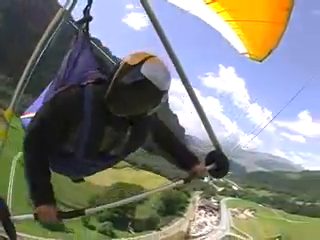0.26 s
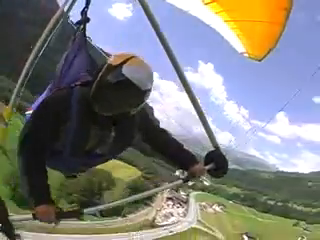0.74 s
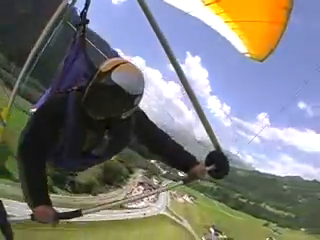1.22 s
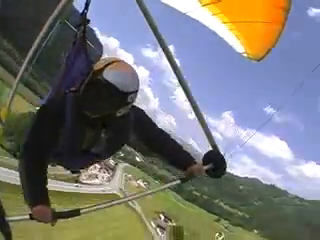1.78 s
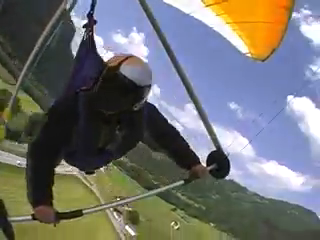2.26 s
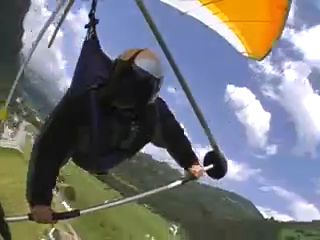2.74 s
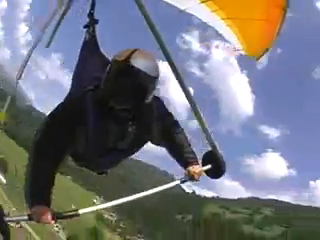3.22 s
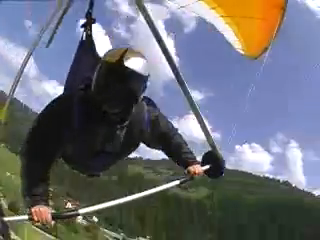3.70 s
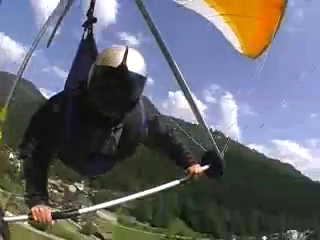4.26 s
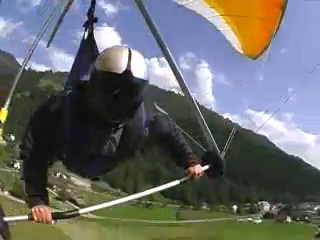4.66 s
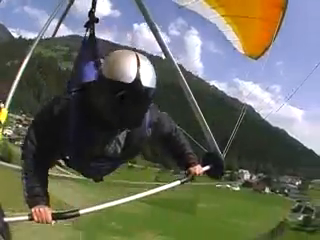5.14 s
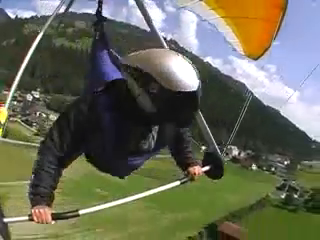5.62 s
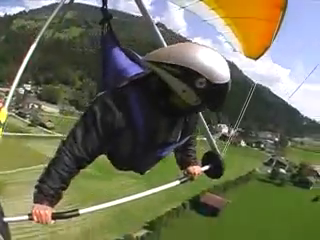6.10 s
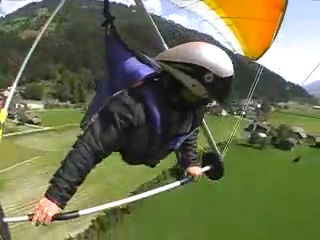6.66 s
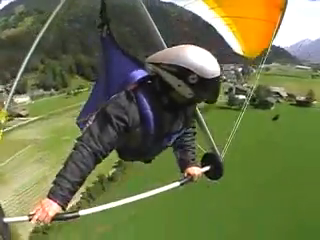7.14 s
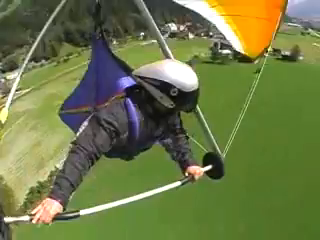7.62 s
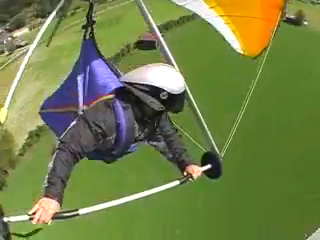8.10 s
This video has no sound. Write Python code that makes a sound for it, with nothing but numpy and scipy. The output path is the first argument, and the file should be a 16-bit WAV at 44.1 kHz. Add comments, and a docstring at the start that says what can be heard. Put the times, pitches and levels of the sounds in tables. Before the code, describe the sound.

Continuous airflow rushes over a microphone in flight, with low thumping gusts building, easing into rough fluttering snaps, and rising at the end.

```python
"""Air streams past the microphone of a camera fixed to a hang glider, swelling in the turn and easing after it.
Large eddies heave, buffet and roar on the port as slow pressure fluctuations, the strongest gusts as single
low thumps. Small eddies flutter and snap at its edge, and the stream rushes and hisses over the frame and the
sail. Each size of eddy is noise filtered to its own band; the small ones ride on the large. One faint treble
tick is a decaying noise burst."""
import sys
import numpy as np
from scipy import signal
from scipy.fft import rfft, irfft, next_fast_len
from scipy.io import wavfile
from scipy.ndimage import uniform_filter1d, map_coordinates

SR = 44100
rng = np.random.default_rng(int(sys.argv[2]) if len(sys.argv) > 2 else 0)


def generate_wav(sig):
    """Save sig (samples, or channels by samples) to the path in sys.argv[1] as 16-bit PCM at SR."""
    pcm = np.round(np.clip(np.atleast_2d(sig).T, -1, 1) * 32767).astype(np.int16)
    wavfile.write(sys.argv[1], SR, pcm)


N = 369116  # samples


def amp(db):
    """Decibel law: the amplitude ratio of a level in dB."""
    return 10 ** (np.asarray(db) / 20)


def unit(x):
    """Normalization by mean square: x brought to rms 1."""
    return x / np.sqrt(np.mean(x ** 2) + 1e-20)


def curves(rows):
    """Linear interpolation: one value per sample for each column after the time."""
    start_s, *columns = np.transpose(rows)
    t = np.arange(N) / SR
    return [np.interp(t, start_s, column) for column in columns]


def wobble(rate_hz):
    """Band-limited chance: a smooth curve through random knots, rate_hz knots a second."""
    knots = rng.standard_normal(int(N * rate_hz / SR) + 4)
    return map_coordinates(knots, [np.arange(N) * rate_hz / SR])


def colour(x, spectrum):
    """Minimum-phase filtering: the folded cepstrum makes the (pitch_hz, level_db) response causal."""
    m = 2 * next_fast_len(N // 2 + 8192)  # even, with room for the filter to ring out
    pitch_hz, level_db = np.transpose(spectrum)
    hz = np.fft.rfftfreq(m, 1 / SR)
    gain_db = np.interp(np.log(hz + 1), np.log(pitch_hz + 1), level_db)
    cepstrum = irfft(np.log(amp(gain_db)), m)
    cepstrum[1:m // 2] *= 2
    cepstrum[m // 2 + 1:] = 0
    response = np.exp(rfft(cepstrum))
    return irfft(rfft(x, m) * response, m)[:N]


def stream(spectrum, lumps_db, patchy_db):
    """Intermittency of turbulence: rms-1 noise, lumpy in time, with random gain patches in time and pitch."""
    cells = signal.stft(rng.standard_normal(N), nperseg=512)[2]
    field = rng.standard_normal(cells.shape)
    field = uniform_filter1d(field, size=6, axis=0)  # across pitch
    field = uniform_filter1d(field, size=8, axis=1)  # along time
    patchy_cells = cells * amp(patchy_db * unit(field))
    noise = signal.istft(patchy_cells, nperseg=512)[1][:N]
    return unit(colour(noise * amp(lumps_db), spectrum))


# spectrum of the treble tick: pitch_hz [Hz], level_db [relative dB per Hz]
TICK_SPECTRUM = [(5000, -40), (6500, -5), (7700, -8), (9500, 1), (10300, 2), (10600, -20.5)]
TICK_START_S, TICK_LEVEL_DB, TICK_T60_S = 0.2575, -47.5, .025  # rms level at the onset


def tick():
    """Exponential decay: one short, thin noise burst in the treble, falling 60 dB in its T60."""
    age_s = np.arange(N) / SR - TICK_START_S
    noise = unit(colour(rng.standard_normal(N), TICK_SPECTRUM))
    decay = (age_s > 0) * amp(TICK_LEVEL_DB - 60 * np.abs(age_s) / TICK_T60_S)
    return noise * decay


# spectrum of the hiss: pitch_hz [Hz], level_db [relative dB per Hz]
HISS_SPECTRUM = [(2500, -45.5), (4000, 3.5), (5500, 2), (7000, 1.5), (9000, -2.5), (10000, -9),
                 (10600, -41.5)]


def hiss(puffs, shreds):
    """Fine-scale turbulence: the smallest eddies give the highest noise band."""
    return stream(HISS_SPECTRUM, 0.5 * puffs + 0.2 * shreds, patchy_db=1.5)


# spectra of the rush in open stream and behind the frame: pitch_hz [Hz], level_db [relative dB per Hz]
OPEN_RUSH_SPECTRUM = [(500, -30), (900, 1.5), (1300, -1), (2000, -4), (3000, -6), (3700, -9.5),
                      (4100, -14.5), (4800, -15.5), (6000, -22.5), (8000, -48.5)]
WAKE_RUSH_SPECTRUM = [(500, -40), (900, 4), (1300, -3), (2000, -8), (3000, -14.5), (4300, -19), (6000, -24),
                      (8000, -48)]


def rush(wake, puffs, shreds):
    """Wake turbulence: the frame breaks the flow into a duller but rougher rush, mixed by power."""
    open_rush = stream(OPEN_RUSH_SPECTRUM, 0.61 * puffs + 0.27 * shreds, patchy_db=0.6)
    wake_rush = stream(WAKE_RUSH_SPECTRUM, 0.69 * puffs + 1.0 * shreds, patchy_db=1.3)
    return np.sqrt(1 - wake) * open_rush + np.sqrt(wake) * wake_rush


# spectrum of the flutter: pitch_hz [Hz], level_db [relative dB per Hz]
FLUTTER_SPECTRUM = [(200, -42), (300, -6), (420, 1), (600, -3), (800, -8), (1100, -25.5), (1600, -33.5),
                    (2500, -63)]


def flutter(wake, puffs, shreds):
    """Edge turbulence: small eddies flutter at the port, less steadily in the wake."""
    lumps_db = 0.3 * puffs + wake * (0.45 * puffs + 0.79 * shreds)
    return stream(FLUTTER_SPECTRUM, lumps_db, patchy_db=0.18)


# spectrum of a bright snap: pitch_hz [Hz], level_db [relative dB per Hz]
SNAP_SPECTRUM = [(300, -25), (700, 3.5), (1200, 1), (2200, -9), (3500, -12), (6000, -23.5), (10000, -59)]


def snap_swarm(level_db):
    """Shot noise: small eddies tear off the port's edge at random, most weakly, a few strongly."""
    place, size, sign = rng.random((3, 3000))
    steps = amp(-4 * np.log(size + 0.03)) * np.sign(sign - .5)
    swarm = np.bincount((place * N).astype(int), steps, N)
    return unit(colour(swarm, SNAP_SPECTRUM)) * amp(level_db)


# the clearest single snaps: start_s [s], level_db [dB, nominal peak], brightness [0 dull - 1 bright]
SINGLE_SNAPS = [(0.208, -23.5, 0.3), (0.3665, -25, 0.3), (1.0321, -24, 0.4), (1.7776, -21, 0.8),
                (2.177, -28, 0.4), (2.9702, -33, 0.5), (3.5635, -25.5, 0.3), (3.7189, -23, 0.5),
                (3.8894, -20, 0.5), (3.9215, -25.5, 0.4), (3.944, -24.5, 0.5), (4.053, -24, 0.3),
                (4.0805, -26, 0.4), (4.138, -35, 0.2), (4.1552, -25, 0.4), (4.2442, -26, 0.3),
                (4.288, -25, 0.3), (4.427, -29, 0.6), (4.722, -31, 0.3), (4.792, -24, 0.4),
                (4.845, -28, 0.6), (4.8796, -22, 0.5), (4.9212, -28, 0.3), (4.9666, -29, 0.6),
                (4.984, -20.5, 0.4), (5.05, -25, 0.5), (5.137, -24, 0.4), (5.1836, -27, 0.5),
                (5.197, -26, 0.7), (5.246, -28, 0.6), (5.374, -22, 0.7), (5.422, -27, 0.6),
                (5.6118, -28, 0.6), (5.697, -30, 0.6), (5.7748, -22.5, 0.5), (5.7999, -26, 0.7),
                (5.899, -25, 0.5), (5.939, -24, 0.5), (6.1234, -25.5, 0.6), (6.1853, -27, 0.4),
                (6.3775, -23, 0.6), (6.4848, -28, 0.7), (6.6428, -20, 0.7), (6.6666, -22.5, 0.4),
                (6.731, -33, 0.3), (6.767, -28, 0.7), (6.848, -28, 0.6), (6.938, -27, 0.5),
                (6.98, -20, 0.4), (7.182, -29, 0.3), (7.1905, -20, 0.3), (7.3891, -31, 0.4),
                (7.423, -31, 0.3), (7.453, -27.5, 0.4), (7.491, -31, 0.6), (7.5882, -31, 0.4),
                (7.6137, -19.5, 0.5), (7.706, -24, 0.3), (7.7787, -20, 0.4), (7.8171, -23.5, 0.5),
                (7.861, -23, 0.4), (7.8743, -18, 0.4), (8.1344, -25.5, 0.3), (8.178, -27, 0.1),
                (8.2394, -17, 0.3), (8.307, -22, 0.3)]
# spectrum of a dull snap: pitch_hz [Hz], level_db [relative dB per Hz]
DULL_SNAP_SPECTRUM = [(250, -25), (600, -5.5), (1000, 0.5), (1800, -6.5), (2800, -19), (4500, -40)]
# the three pressure steps of a snap: level_db [dB re the snap's nominal peak]
TEAR_STEPS_DB = [-3.5, -8, -10]
TEAR_S = .0025  # the second and third steps scatter over this time


def single_snaps():
    """Impulse response: each snap is a leading pressure step and two scattered ones, filtered."""
    out = np.zeros(N)
    start_s, level_db, bright = np.transpose(SINGLE_SNAPS)
    delay, sign = rng.random((2, len(start_s), 3))
    step_s = start_s[:, None] + TEAR_S * delay * [0, 1, 1]
    at = np.round(step_s * SR).astype(int).ravel()
    steps = np.sign(sign - .5) * amp(level_db[:, None] + TEAR_STEPS_DB)
    for spectrum, share in ((SNAP_SPECTRUM, bright), (DULL_SNAP_SPECTRUM, 1 - bright)):
        impulses = np.bincount(at, (steps * share[:, None]).ravel(), N)
        response_peak = np.max(np.abs(colour(signal.unit_impulse(N), spectrum)))
        out += colour(impulses, spectrum) / response_peak
    return out


# spectra of the low and the high roar: pitch_hz [Hz], level_db [relative dB per Hz]
LOW_ROAR_SPECTRUM = [(50, -29), (85, -8), (120, -2), (170, -1), (240, -2.5), (320, -9.5), (480, -32),
                     (800, -84)]
HIGH_ROAR_SPECTRUM = [(70, -39), (120, -14), (180, -1), (250, -2), (330, 0.5), (410, -5), (550, -23),
                      (800, -68.5)]


def roar(high):
    """Eddy-size scaling: smaller eddies roar higher; the two bands share the power."""
    low_roar = stream(LOW_ROAR_SPECTRUM, 0.5 * wobble(30), patchy_db=-0.2)
    high_roar = stream(HIGH_ROAR_SPECTRUM, 0.76 * wobble(30), patchy_db=-0.1)
    return np.sqrt(1 - high) * low_roar + np.sqrt(high) * high_roar


# spectrum of the heave: pitch_hz [Hz], level_db [relative dB per Hz]
HEAVE_SPECTRUM = [(12, -10.5), (22, 8), (35, 5), (50, 9.5), (80, -52)]
# how the heave follows the flow: level_db [dB in open stream at the reference rush and roar],
# rush_slope [dB per dB], roar_slope [dB per dB], wake_rise [dB in full wake]
HEAVE_FLOW_LAW = (-56.5, 1.5, 1.3, 4.5)
REFERENCE_RUSH_DB, REFERENCE_ROAR_DB = -42, -25


def heave(rush_db, roar_db, wake):
    """Power-law flow noise: the lowest band grows as a power of the rush and the roar."""
    level_db, rush_slope, roar_slope, wake_rise = HEAVE_FLOW_LAW
    level_db = level_db + rush_slope * (rush_db - REFERENCE_RUSH_DB)
    level_db = level_db + roar_slope * (roar_db - REFERENCE_ROAR_DB) + wake_rise * wake
    return amp(level_db) * stream(HEAVE_SPECTRUM, 2.5 * wobble(4.5), patchy_db=4.0)


# the strongest gusts: start_s [s], level_db [dB, peak of the swell], pitch_hz [Hz]
STRONGEST_THUMPS = [(0.398, -17.5, 186), (0.561, -20.5, 150), (0.611, -19, 221), (0.658, -18, 254),
                    (0.767, -18, 245), (0.811, -17, 202), (0.946, -18, 312), (1.021, -16, 264),
                    (1.384, -16.5, 137), (1.447, -17.5, 199), (1.545, -14.5, 210), (1.745, -13, 172),
                    (1.794, -18, 140), (1.837, -9.5, 179), (1.893, -15, 195), (2.029, -25, 110),
                    (2.03, -12.5, 155), (2.135, -12.5, 171), (2.324, -13, 150), (2.557, -19, 187),
                    (2.731, -9, 235), (2.764, -17, 210), (2.84, -17, 150), (2.965, -15.5, 160),
                    (3.147, -13.5, 140), (3.725, -15, 151), (3.752, -13.5, 140), (3.94, -17, 278),
                    (3.203, -12.5, 189), (4.786, -22, 285), (4.867, -20.5, 215), (5.036, -16.5, 233),
                    (6.051, -21.5, 162), (6.256, -18, 181), (7.054, -18, 322), (7.17, -18, 197),
                    (7.258, -24, 347), (7.74, -16, 280), (8.115, -18.5, 310)]


def thumps():
    """Tone burst: each strong gust rocks the diaphragm for about two cycles under a Gaussian swell."""
    out = np.zeros(N + SR)
    t = np.arange(SR // 10) / SR
    for start_s, level_db, pitch_hz in STRONGEST_THUMPS:
        swell = np.exp(-((t * pitch_hz - 1.1) / 0.8) ** 2)
        rock = np.sin(2 * np.pi * (pitch_hz * t + rng.random()))
        out[round(start_s * SR):][:len(t)] += amp(level_db) * swell * rock
    return out[:N]


# spectrum of the buffeting: pitch_hz [Hz], level_db [relative dB per Hz]
BUFFET_SPECTRUM = [(25, -30.5), (45, 1), (65, 10.5), (85, 11.5), (120, 10), (200, -50)]


def buffet():
    """Turbulent pressure fluctuation: large eddies press on the port, with slow chance in level."""
    return stream(BUFFET_SPECTRUM, 1.5 * wobble(7.9), patchy_db=1.5)


RIDE_DB_PER_DB, RIDE_WINDOW_S = 0.15, .006


def ride(large, roar_db):
    """Amplitude modulation: small eddies swell with the short-time power of the large ones carrying them."""
    power = np.abs(uniform_filter1d(large ** 2, size=round(RIDE_WINDOW_S * SR))) + 1e-9
    return (power / amp(2 * roar_db)) ** (RIDE_DB_PER_DB / 2)


# the airflow, small eddies before they ride on the large: start_s [s], rush_db [dB],
# hiss_db [dB re the rush], roar_db [dB], flutter_db [dB]
AIRFLOW = [(0.0, -40, -12, -23, -31), (0.07, -45.5, -13, -25.5, -40.5), (0.11, -45, -12, -29.5, -29.5),
           (0.14, -43, -12, -25.5, -38), (0.21, -45.5, -9.5, -27, -33), (0.23, -45.5, -11.5, -31, -41),
           (0.28, -41.5, -18, -24.5, -32), (0.37, -43.5, -14.5, -26.5, -33.5),
           (0.42, -44, -18, -22.5, -33.5), (0.51, -45.5, -12, -28, -36.5), (0.58, -44.5, -16.5, -23, -36.5),
           (0.61, -44, -18, -25.5, -35.5), (0.7, -42, -15, -26.5, -33.5), (0.86, -43, -15.5, -25, -37.5),
           (1.05, -40, -16, -26.5, -37), (1.24, -40, -15.5, -25.5, -33.5), (1.37, -40.5, -16, -27.5, -38.5),
           (1.44, -39.5, -12.5, -26, -34), (1.49, -40, -14, -24, -36), (1.77, -37.5, -15.5, -24.5, -32),
           (1.86, -37.5, -14, -18.5, -31.5), (1.89, -37.5, -16.5, -23.5, -33),
           (2.0, -37, -14.5, -22, -32.5), (2.2, -39, -14.5, -23.5, -33.5), (2.4, -35, -14, -23.5, -31),
           (2.6, -37, -12.5, -22, -32.5), (2.8, -36.5, -13, -24, -31.5), (2.9, -36.5, -12.5, -21.5, -30),
           (3.05, -36.5, -11.5, -22, -34), (3.2, -35.5, -11.5, -22.5, -31.5), (3.3, -37, -10.5, -23, -34),
           (3.4, -37, -12.5, -24, -32), (3.57, -39.5, -13, -24.5, -35), (3.71, -38, -13, -24.5, -31),
           (3.735, -39, -15, -23.5, -32), (3.75, -42, -11, -25.5, -32.5), (3.86, -44.5, -11, -26.5, -33.5),
           (3.91, -43, -13.5, -26, -31.5), (3.945, -43, -14, -26.5, -32), (3.96, -46.5, -12, -29.5, -35.5),
           (4.01, -45, -12, -33, -32), (4.03, -44, -12, -27, -33), (4.06, -45.5, -13, -27, -32),
           (4.1, -46, -12.5, -28, -34.5), (4.45, -44.5, -13, -27, -32.5), (4.6, -43.5, -14, -26.5, -33),
           (4.78, -45, -14.5, -29, -32), (4.9, -43.5, -15.5, -27.5, -33.5), (5.1, -44, -15.5, -26, -32),
           (5.2, -44.5, -16, -29.5, -31.5), (5.35, -45, -16, -27.5, -33), (5.7, -45.5, -16.5, -28.5, -32),
           (5.85, -44, -18, -28, -32.5), (6.0, -46, -16, -28, -33), (6.1, -45, -17.5, -27.5, -33),
           (6.4, -44, -15.5, -26, -34), (6.55, -45.5, -16, -27, -33), (6.7, -44.5, -16, -27, -32.5),
           (6.85, -45, -16, -27.5, -33.5), (6.92, -43, -14.5, -30, -31), (6.99, -41, -16.5, -24.5, -32.5),
           (7.37, -42.5, -15, -25, -33.5), (7.51, -39.5, -15.5, -27, -34), (7.67, -39.5, -13, -23.5, -28.5),
           (7.69, -40, -14.5, -28.5, -32.5), (7.88, -36, -16, -20, -29.5), (7.95, -35, -15.5, -25, -28),
           (8.09, -35.5, -13, -24, -28.5), (8.25, -36, -12.5, -26, -27.5), (8.35, -39.5, -15.5, -25.5, -31),
           (8.37, -34, -16, -24.5, -30)]
# slow changes of the flow: start_s [s], wake [0 open stream - 1 behind the frame],
# high [0 low roar - 1 high roar], buffet_db [dB]
SLOW_FLOW = [(0, 0.51, 0.15, -37.5), (.35, 0.34, 0.3, -43.5), (.7, 0.14, 0.29, -42.5),
             (1.1, .1, 0.36, -40.5), (1.6, 0.059, 0.17, -35), (2, 0.026, 0.12, -41.5),
             (2.4, 0.035, 0.24, -31), (2.8, 0.079, 0.13, -32.5), (3.1, 0.07, 0.14, -35.5),
             (3.4, 0.065, 0.3, -36), (3.6, 0.35, 0.26, -37), (3.76, 0.5, 0.1, -35), (3.92, 0.49, 0.36, -37),
             (3.96, .7, 1, -44), (4.1, 0.82, 0.34, -42), (4.3, 0.89, 0.4, -47), (4.7, 0.77, 0.41, -48),
             (5.1, 0.98, 0.38, -53), (5.5, 0.95, 0.52, -52), (5.9, 0.93, 0.39, -49), (6.3, 0.91, 0.58, -47),
             (6.8, 0.92, 0.58, -49), (6.95, 0.85, 0.68, -42), (7.1, 0.85, 0.73, -37),
             (7.28, 0.9, 0.93, -41), (7.45, 0.72, 0.57, -49), (7.7, 0.9, 0.3, -47),
             (8.05, 0.91, 0.38, -45.5), (8.37, 0.96, 0.49, -39.5)]


def wind():
    """Superposition of eddy sizes: small ones share their puffs and ride on the large; the wake adds snaps."""
    rush_db, hiss_db, roar_db, flutter_db = curves(AIRFLOW)
    wake, high, buffet_db = curves(SLOW_FLOW)
    puffs, shreds = wobble(22), wobble(130)

    large = amp(buffet_db) * buffet()
    large += heave(rush_db, roar_db, wake)
    large += amp(roar_db) * roar(high)
    large += thumps()

    small = amp(flutter_db) * flutter(wake, puffs, shreds)
    small += amp(rush_db) * rush(wake, puffs, shreds)
    small += amp(rush_db + hiss_db) * hiss(puffs, shreds)

    snaps = snap_swarm(rush_db - 19.0 + 15 * wake) + single_snaps()
    return large + small * ride(large, roar_db) + snaps


def scene():
    """Free field: in open air no walls answer."""
    return (tick() + wind())[None]


BAND_LIMIT_HZ = 10640


def record(dry):
    """Band limitation: the camera keeps nothing above its band limit."""
    m = next_fast_len(N + 8192)
    passband = np.fft.rfftfreq(m, 1 / SR) < BAND_LIMIT_HZ
    return irfft(rfft(dry, m) * passband, m)[:, :N]


dry = scene()
out = record(dry)
generate_wav(out)
```